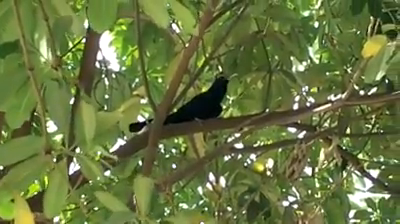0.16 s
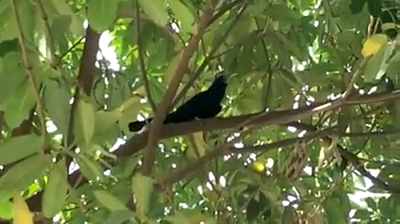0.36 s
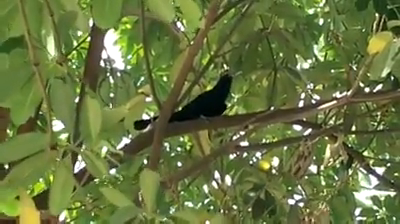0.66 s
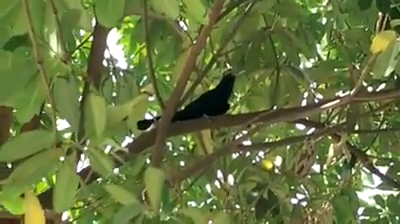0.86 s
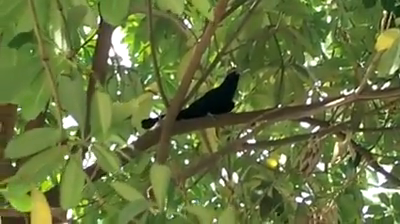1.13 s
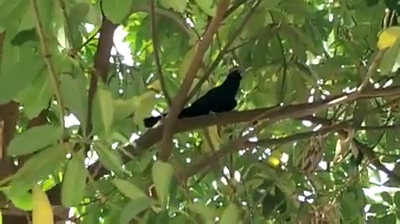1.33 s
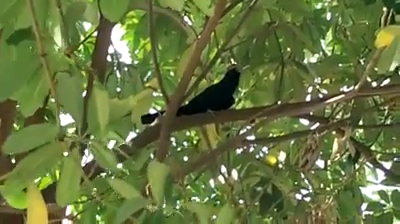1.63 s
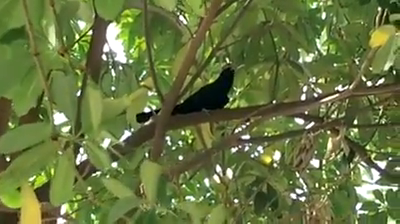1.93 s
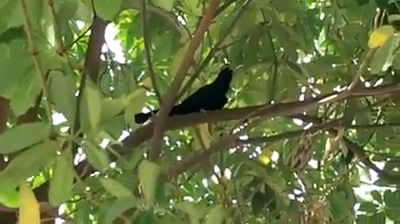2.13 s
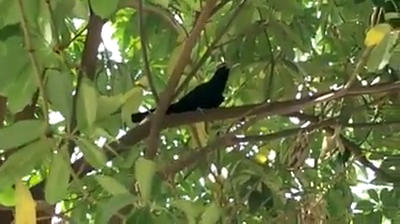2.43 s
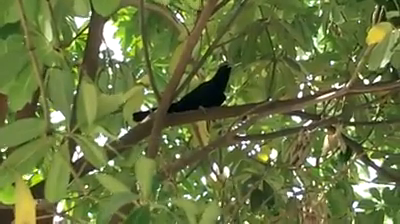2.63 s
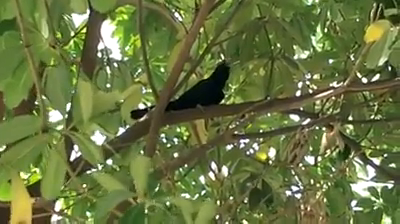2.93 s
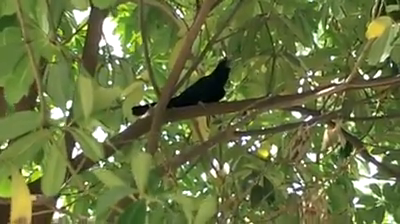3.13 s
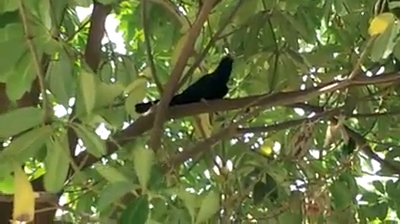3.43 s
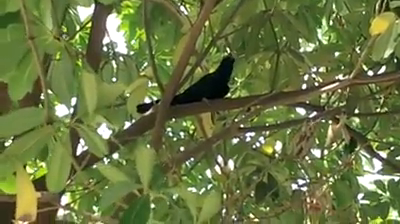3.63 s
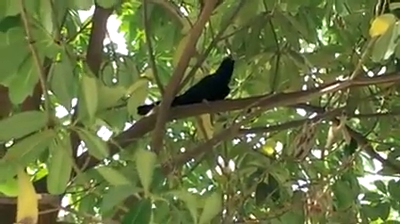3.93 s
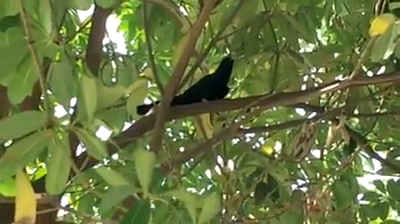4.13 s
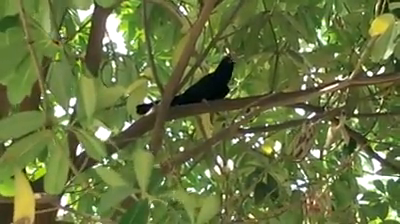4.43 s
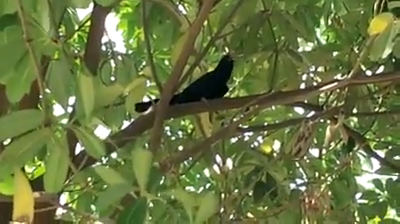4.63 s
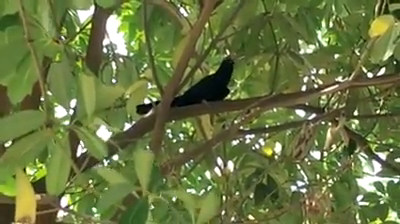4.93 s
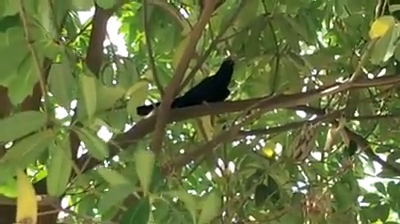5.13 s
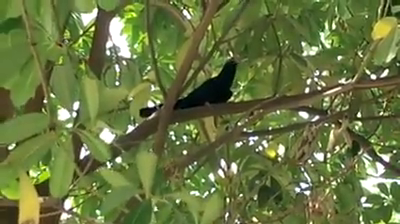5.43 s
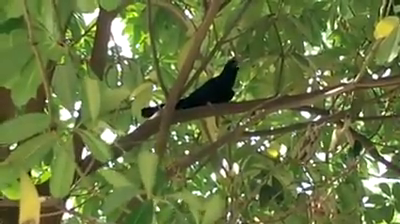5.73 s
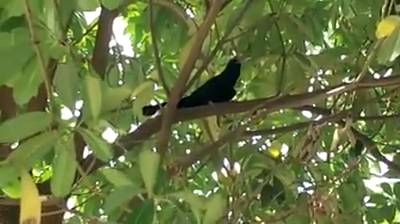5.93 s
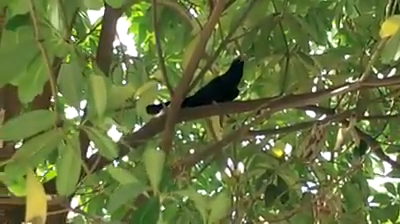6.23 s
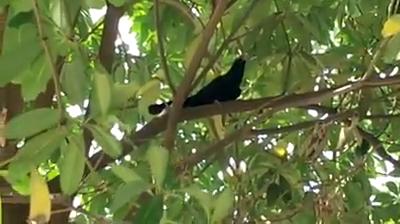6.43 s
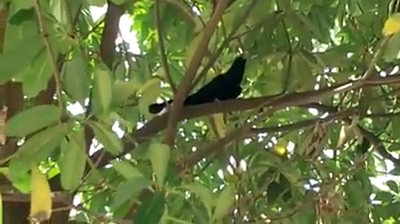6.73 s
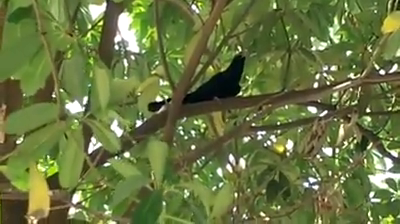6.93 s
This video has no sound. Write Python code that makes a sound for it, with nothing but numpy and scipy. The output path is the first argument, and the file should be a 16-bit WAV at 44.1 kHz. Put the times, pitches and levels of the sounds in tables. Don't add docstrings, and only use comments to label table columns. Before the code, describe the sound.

Five clear, swooping two-part bird whistles ring through a leafy garden, climbing in pitch and turning raspy, above faint distant traffic rumble.

```python
import sys
import numpy as np
from scipy import signal
from scipy.fft import rfft, irfft, next_fast_len
from scipy.io import wavfile
from scipy.ndimage import uniform_filter1d, minimum_filter1d, map_coordinates

SR = 44100
rng = np.random.default_rng(int(sys.argv[2]) if len(sys.argv) > 2 else 0)


def field_ratio(decibels):
    return 10 ** (np.asarray(decibels, dtype=float) / 20)


def waveform_to_disk(signal):
    frames = np.transpose(np.atleast_2d(signal))
    scaled = np.clip(frames, -1, 1) * 32767
    samples = np.round(scaled).astype(np.int16)
    wavfile.write(sys.argv[1], SR, samples)


N = 311778

# start_s, drop_after_s, length_s, dip_hz, peak_hz
CALLS = [
    (0.154, .39, .48, 1273, 1722),
    (1.537, 0.39, 0.48, 1318, 1780),
    (2.921, 0.39, .48, 1335, 1800),
    (4.525, .392, .475, 1336, 1862),
    (5.904, .382, .452, 1380, 1877),
]
# age_s, pitch_height (0 dip, 1 peak), effort_db, beak_opening (0-1)
CALL_SHAPE = [
    (0, -0.39, -25.5, 0.49),
    (.027, 0.45, -7.5, 0.57),
    (.118, -0.067, -2.5, 0.091),
    (0.201, .04, -2.5, 0.056),
    (.25, .27, -2, 0.13),
    (.334, 0.97, 1.5, 0.19),
    (.386, 0.86, -2.5, 0.47),
    (0.431, 0.039, -2, .95),
    (0.481, -1.073, -17, 0.84),
]
# peak_s, drop_s, end_s
SHAPE_TIMES = (.334, .386, .48)
# multiple, level_db
OVERTONES = [(3, -27.5), (4, -25), (5, -30), (6, -36), (7, -39.5), (8, -42.5), (9, -48), (10, -48.5),
             (11, -59.5)]
# pitch_hz, level_db
GULLET = [(900, -2.5), (1270, -3), (1350, 2), (1450, -0.5), (1530, -6.5), (1570, 5), (1720, -1.5),
          (1865, 0.5)]
# pitch_hz, level_db
OCTAVE = [(2000, -36), (2700, -33), (3000, -28), (3300, -28), (3500, -24.5), (3720, -18)]
# pitch_hz, level_db
OVERTONE_COLOUR = [(2500, -17.5), (3600, -20), (4300, -4), (4850, -8.5), (5600, 7), (7000, -3), (8200, -9.5),
                   (9100, 5), (9800, -9.5), (11500, 6), (13500, 17), (15300, 11.5)]
# peak_s, level_db, loss_db_per_s (after the peak)
CRACKS = [
    (3.295, -55, 12),
    (4.908, -36.5, 45),
    (6.277, -34.5, 177),
]
# pitch_hz, level_db
RASP = [(1600, -8.5), (2000, 20), (2400, 22), (2800, 13.5), (3400, 9.5), (4300, 4), (5200, -7),
        (12000, -15)]

# start_s, level_db, pitch_hz, length_s
PUFFS = [
    (1.03, -64, 5900, .07),
    (6.73, -66, 5900, .07),
]
# start_s, level_db, pitch_hz, length_s
CHIRPS = [
    (0.47, -62, 1600, 1),
    (0.57, -55, 3400, 0.59),
]
# start_s, level_db, pitch_hz, length_s
HOOTS = [
    (6.6, -59, 671, 0.073),
    (6.9, -57.5, 676, 0.25),
]
# start_s, level_db, pitch_hz, length_s
RUSTLES = [
    (5.905, -40.5, 895, 0.048),
]

# pitch_hz, decay_s
LEAVES = [(800, 0.15), (3000, 0.18), (12000, 0.067)]
# pitch_hz, decay_s
TREES = [(800, 0.47), (1600, 0.52), (2600, 0.69), (3700, 0.67), (6000, 0.63), (12000, 0.23)]
# pitch_hz, decay_s
WALLS = [(800, 0.94), (1700, 1.71), (2600, 1.2), (3600, 1.6), (7000, 0.77)]
# level_db, decay_s
YARD_RING = (-2, 0.46)

# time_s, level_db
DRONE_LOAD = [(0.0, -58.5), (0.43, -49.5), (2.36, -59.5), (2.5, -45), (3.29, -48), (3.33, -65),
              (4.25, -53.5), (4.37, -64), (4.43, -48.5), (6.18, -54.5), (6.22, -62), (6.36, -47),
              (6.99, -47), (7.07, -59)]
# start_s, length_s, level_db
WHINE_SWELLS = [
    (0.85, .3, -56),
    (4.7, 1.0, -52),
    (6.3, .7, -56),
]
# pitch_hz, level_db (per Hz)
TOWN = [(12, -79.5), (32, -12.5), (98, -7.5), (168, -8), (242, -10.5), (285, -13), (403, -15.5), (557, -18),
        (1170, -21.5), (1540, -20.5), (1810, -21.5), (4160, -33), (5000, -75), (6500, -125.5),
        (11000, -120)]
# pitch_hz, likeness (-1 to 1)
ALIKE = [(30, 0.95), (70, 1), (150, 0.99), (380, 0.82), (950, 0.042), (2380, 0.31), (5980, -1),
         (15000, 0.2)]
# pitch_hz, level_db
BAND_PRICE = [(2600, -38), (3600, 5), (7000, -0.5), (10000, -5), (13000, 1), (15000, 7.5)]


def unit(x):
    return x / np.sqrt(np.mean(x ** 2) + 1e-20)


def along(points, hz):
    f, v = np.transpose(points)
    return np.interp(np.log(hz + 1), np.log(f + 1), v)


def curves(rows):
    s, *cols = np.transpose(rows)
    return [np.interp(np.arange(N) / SR, s, c) for c in cols]


def wobble(rate):
    return map_coordinates(rng.standard_normal(int(N * rate / SR) + 4), [np.arange(N) * rate / SR])


def filtered(x, response):
    m = next_fast_len(N + SR // 2)
    return irfft(rfft(x, m) * response(np.fft.rfftfreq(m, 1 / SR)), m)[..., :N]


def paced(age, drop, length):
    peak_s, drop_s, end_s = SHAPE_TIMES
    peak = peak_s * (drop / drop_s + length / end_s) / 2
    return np.interp(age, [0, peak_s, drop_s, end_s], [0, peak, drop, length])


def koel():
    voice, raspy, time = np.zeros(N), np.zeros(N), np.arange(N) / SR
    shake, flutter, breath = wobble(150), wobble(900), wobble(350)
    air = rng.standard_normal(N)
    rise_db_s, fall_db_s = 398, 601.5
    rasp = sum(field_ratio(db + np.minimum(rise_db_s * (time - s), fall_db_s * (s - time))) for s, db, _ in CRACKS)
    spent_db = sum(loss * (time - s) * (time > s) * (time < s + .5) for s, _, loss in CRACKS)
    first, second = CALL_SHAPE[0], CALL_SHAPE[1]
    for start, drop, length, dip_hz, peak_hz in CALLS:
        on = slice(round(start * SR), round((start + length) * SR))
        age = time[on] - start
        rows = [(start + paced(a, drop, length), *r) for a, *r in CALL_SHAPE]
        height, effort_db, beak = (c[on] for c in curves(rows))

        scoop = np.clip(age / second[0], 0, 1)
        ease = np.sin(np.pi * scoop / 2) - scoop
        height += (second[1] - first[1]) * ease
        effort_db += -18 - spent_db[on] + 0.32 * (second[2] - first[2]) * ease
        pitch = uniform_filter1d(dip_hz + (peak_hz - dip_hz) * height, size=700)
        phase = 2 * np.pi * np.cumsum(pitch * (1 + 0.0021 * shake[on])) / SR
        fall = np.clip(-np.gradient(np.log(pitch)) * SR - 2.5, 0, 4)
        edge = np.clip(np.minimum(age / 0.008, (age[-1] - age) / 0.029), 0, 1)

        tone = field_ratio(along(GULLET, pitch)) * np.sin(phase)
        octave_db = along(OCTAVE, 2 * pitch) + 11 * beak + 39 * np.exp(-age / 0.017) - 1.3 * fall
        tone += field_ratio(octave_db) * (0.91 + .22 * breath[on]) * np.sin(2 * phase)
        for k, db in OVERTONES:
            over_db = db - 3 + 6 * beak - 1.5 * fall + along(OVERTONE_COLOUR, k * pitch)
            hoarse = 3 / k + 0.44 * np.roll(breath, k * SR // 10)[on]
            tone += field_ratio(over_db) * hoarse * np.sin(k * phase)
        voice[on] += np.sqrt(2) * edge * field_ratio(effort_db) * tone

        skip = np.sqrt(2) * np.sin(3 * phase / 2) * field_ratio(4 * flutter[on])
        crack = rasp[on] * (0.41 * field_ratio(-4 * fall) * skip + 1.76 * air[on])
        husk = field_ratio(effort_db - 51.5 - 13.5 * height) * air[on]
        raspy[on] += edge * (crack + husk)
    return voice + filtered(raspy, lambda hz: field_ratio(along(RASP, hz)))


def neighbours():
    out, time = np.zeros(N), np.arange(N) / SR
    for rows, shake, speed in ((PUFFS, .09, 500), (CHIRPS, .035, 200), (HOOTS, .012, 40), (RUSTLES, .5, 900)):
        waver = wobble(speed)
        for s, db, hz, length in rows:
            u = np.clip((time - s) / length, 0, 1)
            phase = 2 * np.pi * np.cumsum(hz * (1 + shake * waver)) / SR
            out += field_ratio(db) * np.sin(np.pi * u) * np.sin(phase)
    return out


def tail(decay, delay):
    hz, t, z = signal.stft(rng.standard_normal((2, 2 * SR)), SR, nperseg=256)
    out = signal.istft(z * field_ratio(-60 * t / along(decay, hz)[:, None]), SR, nperseg=256)[1]
    out = np.pad(out, ((0, 0), (round(delay * SR), 0)))[:, :2 * SR]
    return out / np.linalg.norm(out, axis=1, keepdims=True)


def garden():
    paths = field_ratio(-1.5) * tail(LEAVES, delay=0.0097)
    paths += field_ratio(-2.5) * tail(TREES, delay=.02)
    paths += field_ratio(-17.5) * tail(WALLS, delay=.09)
    paths[[0, 1], [440, 442]] += field_ratio(-1)
    gain = rfft(paths)
    even = uniform_filter1d(abs(gain) ** 2, size=140, axis=1) ** -.4
    paths = irfft(gain * even)[:, :round(1.8 * SR)]
    ring_hz, (db, decay_s) = 1858, YARD_RING
    t = np.arange(paths.shape[1]) / SR
    ring = field_ratio(db - 47 - 60 * t / decay_s) * (1 - np.exp(-t / .04)) * np.sin(2 * np.pi * ring_hz * t)
    return paths + ring


def hum():
    time = np.arange(N) / SR
    drone_hz = 97.4 + 2.524 * wobble(67)
    drone_db = curves(DRONE_LOAD)[0] + 2.0 + 2.8 * wobble(20)
    drone = field_ratio(drone_db) * np.sin(2 * np.pi * np.cumsum(drone_hz) / SR)
    swell = field_ratio(-57.5)
    for s, length, db in WHINE_SWELLS:
        swell = swell + field_ratio(db) * np.sin(np.pi * np.clip((time - s) / length, 0, 1))
    whine_hz = 405 + 1.75 * wobble(8)
    whine = swell * field_ratio(-6.5 + 0.53 * wobble(10.0)) * np.sin(2 * np.pi * np.cumsum(whine_hz) / SR)
    return drone + whine


def town():
    z = signal.stft(rng.standard_normal((2, N)), nperseg=512)[2]
    patches = uniform_filter1d(rng.standard_normal(z.shape[1:]), size=5, axis=0)
    patches = uniform_filter1d(patches, size=14, axis=1)
    pair = signal.istft(z * field_ratio(1.83 * unit(patches)), nperseg=512)[1][:, :N]

    def response(hz):
        spread = np.arccos(np.clip(along(ALIKE, hz), -1, 1)) / 2
        return field_ratio(along(TOWN, hz)) * [np.cos(spread), np.sin(spread)]

    mid, side = filtered(pair, response)
    level_db = -51.5 + 3.5 + 1.3 * wobble(2.81)
    return field_ratio(level_db) * unit(np.array([mid + side, mid - side]))


def scene():
    birds = (koel() + neighbours())[None]
    heard = signal.fftconvolve(birds, garden(), axes=1)[:, round(.01 * SR):][:, :N]
    lag_s = 0.0004
    drone = filtered(hum(), lambda hz: np.exp(np.pi * 1j * hz * lag_s * np.array([[1], [-1]])))
    return field_ratio(4.5) * heard + (town() + drone) * field_ratio([[-.7], [.7]])


def masked(x, near_db, below_db, far_db, quiet_db):
    hz, t, z = signal.stft(x, SR, nperseg=2048, noverlap=1024)
    power, hz = abs(z) ** 2 + 1e-20, hz[:, None]
    level = 10 * np.log10(uniform_filter1d(power, size=7, axis=1))

    def loudest(shift):
        return -minimum_filter1d(-level, size=29, axis=1, origin=shift)

    hidden = (level < loudest(shift=14) + near_db) & (hz > 2050)
    hidden |= (level < loudest(shift=-14) + below_db) & (hz > 900)
    bands = 10 * np.log10(power[:, :1024].reshape(2, 64, 16, -1).mean(axis=2))
    whim = 4 * unit(uniform_filter1d(rng.standard_normal(bands.shape[1:]), size=3, axis=1))
    need = np.maximum(level.max(axis=1, keepdims=True) + far_db, quiet_db)
    need = need + whim + along(BAND_PRICE, hz[8::16])
    hidden[:, :1024] |= np.repeat(bands < need, 16, axis=1)
    return signal.istft(z * ~hidden, SR, nperseg=2048, noverlap=1024)[1][:, :N]


def roll_off(x):
    return signal.sosfilt(signal.butter(12, 15720, fs=SR, output="sos"), x)


def record(dry):
    need = np.minimum(1, .85 / (abs(dry).max(axis=0) + 1e-9))
    held = dry * uniform_filter1d(minimum_filter1d(need, size=800), size=400)
    treble = [(2500, 0), (6000, 1.2), (14000, 2.6)]  # pitch_hz, level_db
    tilted = filtered(held, lambda hz: field_ratio(along(treble, hz) * np.array([[-1], [1]])))
    kept = masked(tilted, near_db=-32.5, below_db=-57.0, far_db=-55.0, quiet_db=-91.0)
    hiss = field_ratio(-91.0) * filtered(rng.standard_normal(dry.shape), lambda hz: hz < 12500)
    return roll_off(kept + hiss)


dry = scene()
out = record(dry)
waveform_to_disk(out)
```